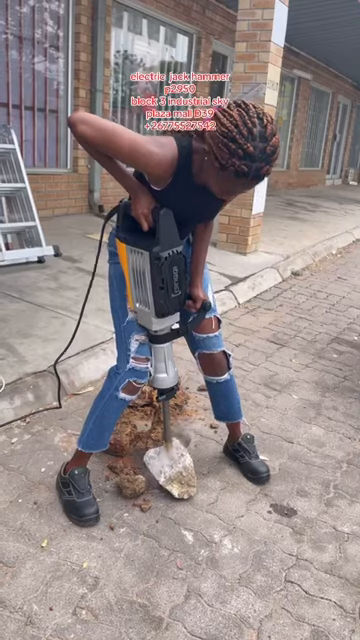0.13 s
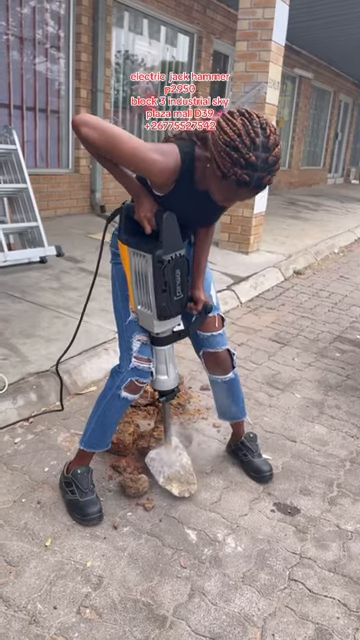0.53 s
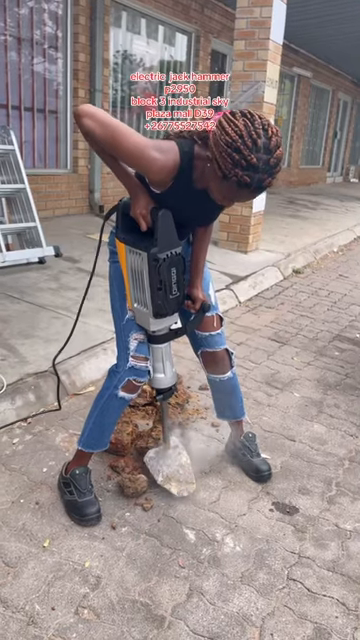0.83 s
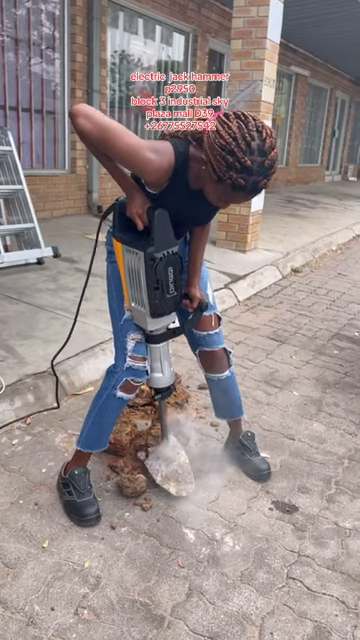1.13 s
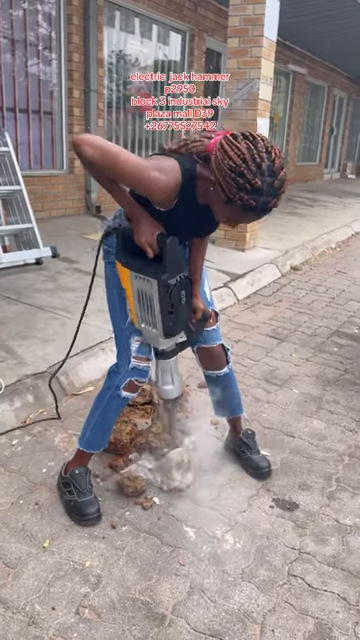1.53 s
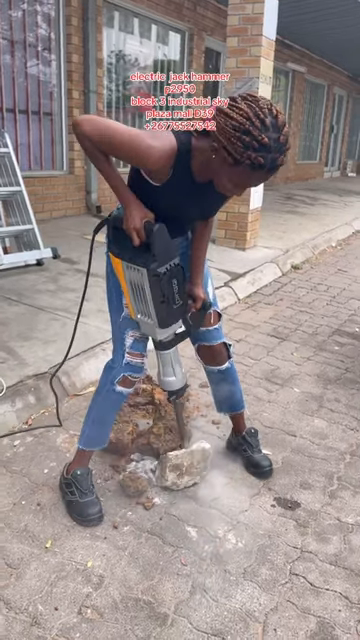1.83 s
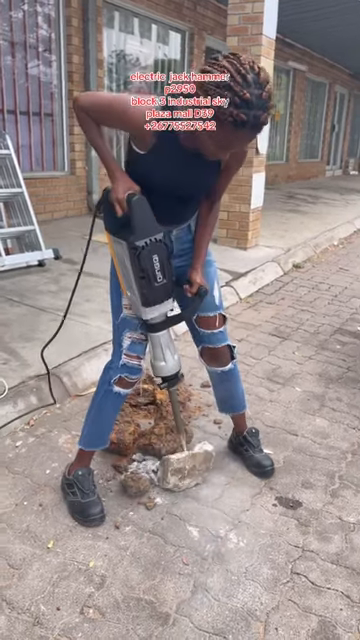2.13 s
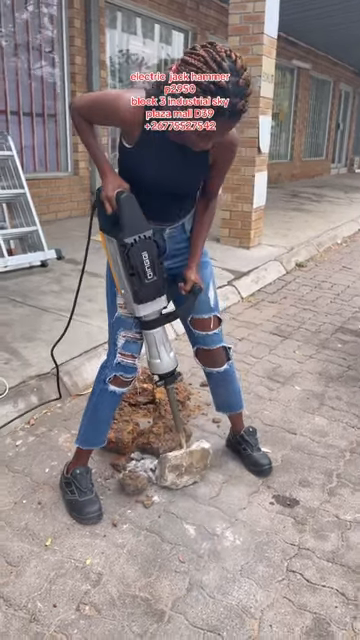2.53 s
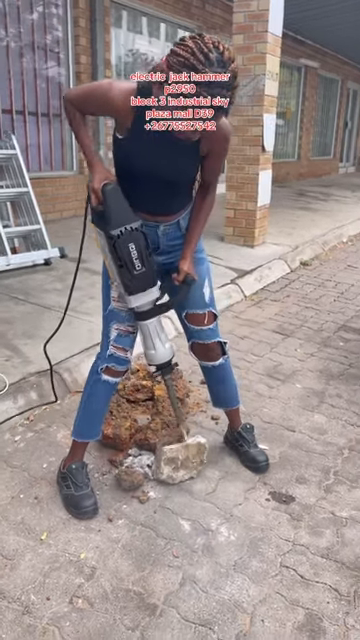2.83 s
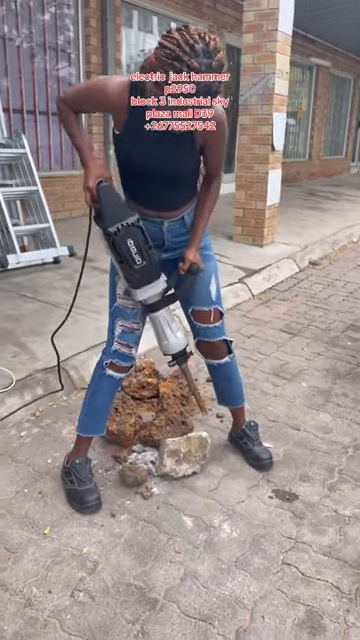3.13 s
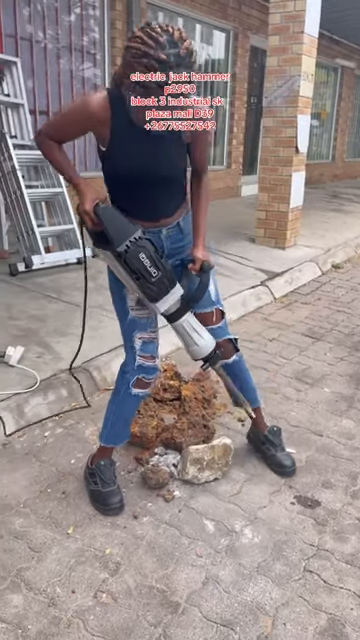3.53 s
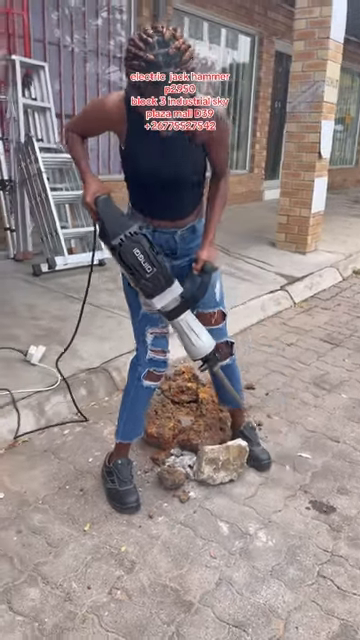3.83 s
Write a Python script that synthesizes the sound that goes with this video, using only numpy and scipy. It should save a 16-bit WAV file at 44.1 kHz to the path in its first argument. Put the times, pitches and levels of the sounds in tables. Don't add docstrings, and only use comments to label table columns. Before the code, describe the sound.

An electric jackhammer hammers a loose rock on a paved street, about two dozen blows a second, with steel ring and stone crunch; the rock splits and only motor whirr remains, heard close on a stereo phone.

```python
import sys
import numpy as np
from scipy import signal
from scipy.fft import rfft, irfft, next_fast_len
from scipy.io import wavfile
from scipy.ndimage import uniform_filter1d, map_coordinates

SR = 44100
rng = np.random.default_rng(int(sys.argv[2]) if len(sys.argv) > 2 else 0)


def natural_amplitude(level_db):
    exponent = np.asarray(level_db, float) / 20
    return 10 ** exponent


def inscribe(sig):
    pcm = np.round(np.clip(np.atleast_2d(sig).T, -1, 1) * 32767)
    wavfile.write(sys.argv[1], SR, pcm.astype(np.int16))


N = 176400


def unit(x):
    return x / np.sqrt(np.mean(x ** 2) + 1e-20)


def along(points, hz):
    f, v = np.transpose(points)
    return np.interp(np.log(hz + 1), np.log(f + 1), v)


def curves(rows):
    s, *columns = np.transpose(rows)
    return [np.interp(np.arange(N) / SR, s, column) for column in columns]


def wobble(rate):
    knots = rng.standard_normal(int(N * rate / SR) + 4)
    return map_coordinates(knots, [np.arange(N) * rate / SR])


def filtered(x, response):
    m = next_fast_len(N + SR // 2)
    return irfft(rfft(x, m) * response(np.fft.rfftfreq(m, 1 / SR)), m)[..., :N]


def add_at(track, start_s, sound):
    track[round(start_s * SR):][:len(sound)] += sound


def patchy(x, depth_db, bins, frames, tilt=0):
    hz, t, z = signal.stft(x, SR, nperseg=256)
    field = uniform_filter1d(rng.standard_normal(z.shape), bins, 0)
    field = unit(uniform_filter1d(field, frames, 1))
    tilt_now = np.interp(t * SR, np.arange(N), tilt + np.zeros(N))
    tilt_db = np.log10((hz[:, None] + 99) / 2500) * tilt_now
    return signal.istft(z * natural_amplitude(depth_db * field + tilt_db), SR, nperseg=256)[1][:N]


def resonances(peaks):
    def gain(f):
        power = 0
        for c, w, db in peaks:
            power = power + natural_amplitude(2 * db) * (f * w) ** 2 / ((c * c - f * f) ** 2 + (f * w) ** 2)
        return np.sqrt(power)
    return gain


def ringing(modes, t, rise_s, scatter_db, drift_hz):
    draw = rng.standard_normal((len(modes), 3))
    tone = 0
    for (hz, db, t60), (louder, sharper, shift) in zip(modes, draw):
        fade = natural_amplitude(db + scatter_db * louder - 60 * t / t60)
        tone = tone + fade * np.sin(2 * np.pi * (hz + drift_hz * sharper) * t + 0.45 * shift)
    return tone * (1 - np.exp(-t / rise_s))


# start_s [s], level_db [dB], brightness [dB a decade], housing_db [dB]
MOTOR_PATH = [(.05, -21.5, 5.5, -4), (.3, -32, 23, 3), (.7, -37, 19.5, 4.5), (1.3, -33, 10.5, 4.5),
              (1.5, -35, 6, 3.5), (1.8, -33, 7, -4), (2.0, -33, 9, 2.5), (2.05, -27.5, 6.5, -1),
              (2.35, -28, 10, -2.5), (2.72, -28.5, 7.5, -5.5), (3.0, -37, 11, 6), (3.3, -36.5, 6, -1.5),
              (3.6, -47, 12, 16), (3.8, -46.5, 7, 7.5), (4, -46.5, 5.5, 8.5)]
# start_s [s], speed [turns a second]
CRANK_SPEED = [(0, 24), (1.2, 22), (1.5, 28.6), (2, 26.2), (2.8, 28), (4, 26.7)]
# pitch_hz [Hz], level_db [dB per Hz]
WHIRR_COLOUR = [(150, -1), (500, 1), (1200, -3), (2300, -0.5), (5500, -12), (7500, -7.5), (11000, -22),
                (15600, -31.5), (16300, -68)]
# pitch_hz [Hz], width_hz [Hz], level_db [dB]
HOUSING_PEAKS = [(730, 147, 0.5), (2426, 60, 7), (2500, 60, -3.5), (3130, 53, -6.5)]
# pitch_hz [Hz], width_hz [Hz], level_db [dB]
VENT_SIDE = [(3805, 99, -2.5), (4280, 120, 0), (4940, 190, 3), (5360, 68, 4), (5350, 92, -6)]
# pitch_hz [Hz], width_hz [Hz], level_db [dB]
GEAR_SIDE = [(1345, 62, -1), (1594, 77, -2.5), (1935, 32, 0), (2100, 40, -7), (3010, 29, 8),
             (3010, 33, -16.5)]
# start_s [s], vent_side_db [dB], gear_side_db [dB]
FACING_PATH = [(.05, 1, -17), (1.5, 7, 4), (1.9, 7, 6.5), (2.1, 2.5, 0), (2.4, 4, 1), (2.699, 1.5, -0.5),
               (3.0, 6, 2.5), (3.3, 8, -6), (3.6, 13, 11), (4, 8.5, -4)]
# middle_s [s], half_length_s [s], pitch_hz [Hz], width_hz [Hz], level_db [dB]
VENT_PASS = (2.87, .14, 4050, 450, 10)


def motor():
    housing_gain_db = 3.5
    level_db, bright_db, housing_db = curves(MOTOR_PATH)
    turns = np.cumsum(curves(CRANK_SPEED)[0]) / SR
    throb_db = 1.5 * np.sin(2 * np.pi * turns) + 0.31 * np.sin(6 * np.pi * turns)
    throb_db = throb_db + 0.5 * wobble(40) + 0.045 * wobble(17.0)
    grit = rng.standard_normal(N) * natural_amplitude(1.5 * wobble(2500) + throb_db)
    grit = patchy(grit, 1.25, bins=3, frames=30, tilt=bright_db)
    grit = filtered(grit, lambda hz: natural_amplitude(along(WHIRR_COLOUR, hz)))
    passing = np.exp(-((np.arange(N) / SR - VENT_PASS[0]) / VENT_PASS[1]) ** 2)
    mix = grit + passing * filtered(grit, resonances([VENT_PASS[2:]]))
    for side_db, peaks in zip(curves(FACING_PATH), (VENT_SIDE, GEAR_SIDE)):
        mix = mix + natural_amplitude(housing_gain_db + side_db) * filtered(grit, resonances(peaks))
    mix = mix + natural_amplitude(housing_gain_db + housing_db) * filtered(grit, resonances(HOUSING_PEAKS))
    return natural_amplitude(level_db) * unit(mix)


# start_s [s], first_order_db [dB], second_order_db [dB]
HUM_LEVEL = [(.06, -46.5, -56), (.4, -50, -71), (1.3, -58, -48), (1.5, -59.5, -80), (2.12, -58.5, -82),
             (2.25, -60, -52.5), (2.5, -54, -55), (2.62, -59.5, -72), (2.85, -55, -58.5), (3.2, -53.5, -49),
             (3.5, -51, -51), (3.8, -52, -52.5), (3.92, -51.5, -58)]
# start_s [s], pitch_hz [Hz]
ENGINE_PITCH = [(0, 68), (2.3, 65.7), (2.5, 68), (3.2, 68.3), (4, 68.5)]
# start_s [s], level_db [dB]
FOURTH_ORDER = [(0, -71), (2.9, -58), (3.4, -59.5), (3.7, -54), (4, -59)]
# pitch_hz [Hz], level_db [dB per Hz]
RUMBLE_COLOUR = [(15, -62), (25, -39), (54, -10.5), (134, -8.5), (284, -10), (401, -22), (549, -15),
                 (900, -20.5), (1170, -29), (1980, -120)]


def street():
    first_db, second_db = curves(HUM_LEVEL)
    pitch_hz = curves(ENGINE_PITCH)[0] * (1 + 0.005 * wobble(5.88))
    phase = 2 * np.pi * np.cumsum(pitch_hz) / SR
    hum = natural_amplitude(first_db + 1.7 * wobble(32)) * np.sin(phase)
    hum = hum + natural_amplitude(second_db + 2.0 + 0.62 * wobble(19)) * np.sin(2 * phase)
    hum = hum + natural_amplitude(curves(FOURTH_ORDER)[0] + 2.8 * wobble(15)) * np.sin(4 * phase)
    rumble = unit(filtered(rng.standard_normal(N), lambda hz: natural_amplitude(along(RUMBLE_COLOUR, hz))))
    rumble_db = -50 + first_db - first_db.mean() + 1.4 * wobble(1.5)
    return np.sqrt(2) * hum + natural_amplitude(rumble_db) * rumble


def late(hz):
    cycles, under_hz = 2.8, 2600
    ratio = np.minimum(hz + 60, under_hz) / under_hz
    return np.exp(-2j * np.pi * cycles * (np.log(ratio) - ratio)) * (hz > 75)


# start_s [s], peak_db [dB], ring_db [dB], ground_thud_db [dB]
STEADY_BLOWS = [(0.078, -4.5, -4, -22.5), (0.119, -9.5, 8.5, -2.5), (0.156, -0.5, 4.5, -19),
                (0.196, -2, 4, -12.5), (0.237, -3.5, 3.5, -10), (0.277, -1.5, 3, -13.5),
                (0.32, -1, 8.5, -14.5), (0.365, -4.5, 6.5, -12), (0.403, -0.5, 3.5, -14.5),
                (0.449, -1, 5, -14), (0.492, -1.5, 7, -17.5), (0.536, -4, 4.5, -10), (0.58, -4, 3, -12.5),
                (0.623, -3.5, 5, -12.5), (0.667, -4, 5.5, -9.5), (0.71, -3, 3.5, -20.5),
                (0.755, -4, 7, -17), (0.797, -3.5, 4.5, -13), (0.841, -5, 5, -16), (0.885, -4.5, -2, -13),
                (0.929, -6, 2, -11), (0.974, -3.5, 1.5, -18.5), (1.016, -3.5, 7, -13),
                (1.063, -4, 2.5, -12.5), (1.107, -4, 5, -13.5), (1.154, -5.5, 0, -9), (1.203, -3.5, 7, -11),
                (1.25, -5, -2, -12.5)]
# start_s [s], peak_db [dB], ring_db [dB], ground_thud_db [dB]
SPLITTING_BLOWS = [
    (1.3, -4.5, -11, -17),
    (1.352, -8, 9, -36),
    (1.356, -3.5, -0.5, -24),
    (1.402, -9, 0, -21.5),
    (1.455, -10, -33, -22),
]
# start_s [s], level_db [dB]
CHISEL_TICKS = [
    (2.995, -29),
    (3.72, -33),
]
# pitch_hz [Hz], level_db [dB per Hz]
CRACK_COLOUR = [(250, -20.5), (800, -3.5), (1700, -3.5), (4500, -1.5), (6500, -5), (11000, -17.5),
                (15500, -20.5), (17500, -70)]
# pitch_hz [Hz], level_db [dB], fade_60db_s [s]
STEEL_TONES = [(687, -7.5, 0.061), (837, -10.5, 0.066), (953, 4.5, 0.026), (1059, 1.5, 0.025),
               (1156, 11, 0.013), (1423, -2.5, 0.038), (1555, -2, 0.035), (1723, -6.5, 0.051),
               (1847, -8, 0.059), (2618, -1.5, 0.021), (3350, -1.5, 0.032), (4300, -16.5, 0.049),
               (4980, -4.5, 0.027), (7409, 3.5, 0.077)]
# pitch_hz [Hz], level_db [dB], fade_60db_s [s]
GROUND_TONES = [(185, -3, 0.021), (217.4, -4, 0.029), (266.3, -1, 0.026), (325, -9, 0.034)]


def blows():
    rise_s, hold_s, fall_s = 0.00055, 0.0021, 0.022
    rebound_s = .0095
    t = np.arange(SR // 10) / SR
    chips = rng.standard_normal(N) * natural_amplitude(1.46 * wobble(900))
    chips = patchy(chips, 2.2, bins=5, frames=4)
    chips = unit(filtered(chips, lambda hz: natural_amplitude(along(CRACK_COLOUR, hz))))
    chips = np.pad(chips, (0, SR))
    crush = natural_amplitude(-60 * np.maximum(t - hold_s, 0) / fall_s)
    rattle = natural_amplitude(-20 - 60 * t / .07)
    rebound = (t > rebound_s) * natural_amplitude(-15 - 60 * (t - rebound_s) / fall_s)
    shape = (1 - np.exp(-t / rise_s)) * (crush + rattle) + rebound
    track = np.zeros(N + SR)
    ticks = [(s, db, -9, -40) for s, db in CHISEL_TICKS]
    for s, db, ring_db, thud_db in list(STEADY_BLOWS) + list(SPLITTING_BLOWS) + ticks:
        steel = ringing(STEEL_TONES, t, 0.0014, scatter_db=2.3, drift_hz=15.4)
        hit = chips[round(s * SR):][:len(t)] * shape + natural_amplitude(ring_db - 8) * steel
        hit = hit / np.linalg.norm(hit) * np.sqrt(hold_s * SR) / 2
        add_at(track, s, natural_amplitude(db + 2) * hit)
        thud = ringing(GROUND_TONES, t, 0.0041, scatter_db=0.5, drift_hz=2.9)
        add_at(track, s + 0.000054, natural_amplitude(db + thud_db) * thud)
    return filtered(track[:N], late)


# pitch_hz [Hz], level_db [dB per Hz]
DEBRIS_COLOUR = [(5000, -49), (7000, -18), (9500, 2.5), (12500, 0.5), (14500, -9), (16000, -40)]
# pitch_hz [Hz], level_db [dB], fade_60db_s [s]
TIP_TONES = [(7500, -4, .05), (12600, 0, .06), (14600, -3, .05)]


def debris():
    t, spray, tip = np.arange(SR // 8) / SR, np.zeros(N), np.zeros(N)
    for s, db, *_ in list(STEADY_BLOWS) + list(SPLITTING_BLOWS):
        add_at(spray, s, natural_amplitude(db - 30.5 + 1.9 * rng.standard_normal() - 60 * t / 0.1))
        add_at(tip, s, natural_amplitude(db - 22.5) * ringing(TIP_TONES, t, 0.00083, scatter_db=1, drift_hz=147))
    grains = patchy(rng.standard_normal(N) * natural_amplitude(10 * wobble(500)), 5.1, bins=5, frames=3)
    return spray * unit(filtered(grains, lambda hz: natural_amplitude(along(DEBRIS_COLOUR, hz)))) + tip


# start_s [s], peak_db [dB], pitch_hz [Hz]
STONE_RINGS = [(0.0776, -10, 2575), (0.1555, 2, 3310), (0.196, -5.5, 2460), (0.278, -5, 3280),
               (0.3205, -8, 2616), (0.405, -2, 4850), (0.4913, -6, 3350), (0.58, -11, 4720),
               (0.754, -10, 2610), (0.8859, -8, 2580), (0.9747, -2, 4360), (1.0635, -9, 4730),
               (1.1546, -9, 5370), (1.2999, -4.5, 3270), (1.3533, -3, 5000)]


def accents():
    t, ring = np.arange(SR // 20) / SR, np.zeros(N)
    for s, db, hz in STONE_RINGS:
        tone = ringing([(hz, 0, 0.031)], t, 0.0011, scatter_db=0.5, drift_hz=0)
        add_at(ring, s, natural_amplitude(db - 6) * tone)
    return ring


# pitch_hz [Hz], fade_60db_s [s]
FRONT_FADE = [(200, 0.65), (2000, 0.34), (10000, 0.23)]


def shop_front(x):
    hz, t, z = signal.stft(rng.standard_normal((2, SR // 4)), SR, nperseg=256)
    fade = natural_amplitude(-60 * t / along(FRONT_FADE, hz)[:, None])
    tail = signal.istft(z * fade, SR, nperseg=256)[1]
    delayed = np.pad(x, (300, 0))[None]
    return signal.fftconvolve(delayed, tail / np.linalg.norm(tail[0]), axes=1)[:, :N]


# pitch_hz [Hz], level_db [dB], fade_60db_s [s]
FREE_TONES = [(8570, 2, 0.099), (11300, -9.5, 0.21), (12800, -20, 0.058), (14600, 0, 0.049)]
# start_s [s], level_db [dB]
FREE_RINGS = [
    (1.3, -30),
    (1.354, -20),
    (1.456, -32),
]


def free_chisel():
    t, ring = np.arange(SR // 8) / SR, np.zeros(N)
    for s, db in FREE_RINGS:
        add_at(ring, s, natural_amplitude(db) * ringing(FREE_TONES, t, 0.00065, scatter_db=-7.0, drift_hz=30))
    return ring


# start_s [s], pitch_hz [Hz], level_db [dB]
FAN_TONE = [(1.9, 757, -64), (2.05, 765, -47), (2.3, 770, -47), (2.55, 777, -46), (2.75, 798, -51),
            (2.95, 805, -52), (3.1, 794, -75)]


def fan():
    hz, db = curves(FAN_TONE)
    phase = 2 * np.pi * np.cumsum(hz + 11 * wobble(35)) / SR
    return np.sqrt(2) * natural_amplitude(db + 3.1 * wobble(29.94)) * np.sin(phase)


def scattered(x, length):
    smear = rng.standard_normal(length) * natural_amplitude(-40 * np.arange(length) / length)
    return signal.fftconvolve(x, smear / np.linalg.norm(smear))[:N]


# pitch_hz [Hz], likeness [0 to 1]
LIKENESS = [(60, .99), (300, .985), (700, .97), (1400, .975), (3000, .75), (5500, .85), (7000, .975),
            (8500, .975), (10000, .93), (15000, .95)]


def scene():
    hits = blows() + free_chisel() + debris() + accents()
    steady = motor() + fan() + street()
    echo = natural_amplitude(-13.5) * shop_front(hits)
    other = scattered(hits, 1500) + scattered(steady, 8000)

    def shares(hz):
        angle = np.arccos(np.clip(along(LIKENESS, hz), -1, 1)) / 2
        return np.array([np.cos(angle), np.sin(angle)])

    alike, apart = filtered(np.array([hits + steady + echo[0], other + echo[1]]), shares)
    return np.array([alike + apart, alike - apart])


def joint_stereo(x):
    weaker_db, faint_db, from_hz, attack_db = -9, -34.5, 1380, 7
    hz, _, z = signal.stft(np.array([x[0] + x[1], x[0] - x[1]]) / 2, SR, nperseg=1024)
    bands = (abs(z[:, :-1]) ** 2).reshape(2, 64, 8, -1).sum(axis=2)
    bands = 10 * np.log10(bands + 1e-20)
    keep = bands > bands[::-1] + weaker_db
    keep &= bands > bands.max(axis=(0, 1)) + faint_db
    z[:, :-1] *= np.repeat(keep, 8, axis=1) | (hz[:-1, None] < from_hz)
    mid, side = signal.istft(z, SR, nperseg=1024)[1][:, :N]
    power = (x ** 2).sum(axis=0)
    sudden = uniform_filter1d(power, size=128) > natural_amplitude(attack_db) ** 2 * uniform_filter1d(power, size=2048)
    attack = uniform_filter1d(1. * sudden, size=64)
    return attack * x + (1 - attack) * np.array([mid + side, mid - side])


def roll_off(x):
    return signal.sosfilt(signal.butter(12, 17120, fs=SR, output="sos"), x)


# pitch_hz [Hz], lead [radians]
LEFT_LEAD = [(2000, .05), (4300, 1.55), (5600, .05), (7000, 2.6), (8500, 3.7), (9800, 5.75), (12500, 6.85),
             (13400, 8.7), (14600, 9.5), (16000, 10.3)]
# pitch_hz [Hz], difference_db [dB]
LEFT_OVER_RIGHT = [(60, -.9), (300, -2.4), (700, -3.8), (1400, -2.4), (2200, -.4), (3000, -.1)]


def record(dry):
    sides = np.array([[.5], [-.5]])

    def ports(hz):
        return natural_amplitude(sides * along(LEFT_OVER_RIGHT, hz)) * np.exp(1j * sides * along(LEFT_LEAD, hz))

    x = joint_stereo(filtered(dry, ports))
    start_s, fade_s = .0452, 0.00057
    x = x * np.clip((np.arange(N) / SR - start_s) / fade_s, 1e-5, 1)
    mix = filtered(x, lambda hz: hz < 17120)
    return roll_off(mix)


dry = scene()
out = record(dry)
inscribe(out)
```